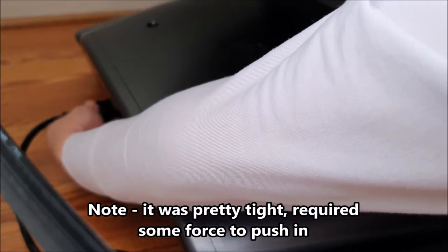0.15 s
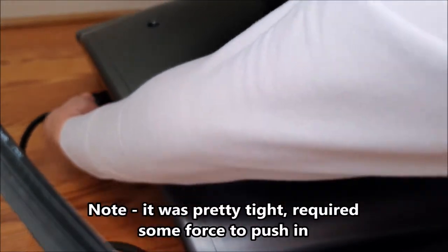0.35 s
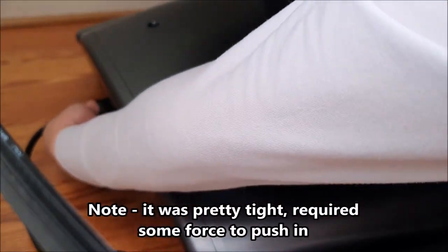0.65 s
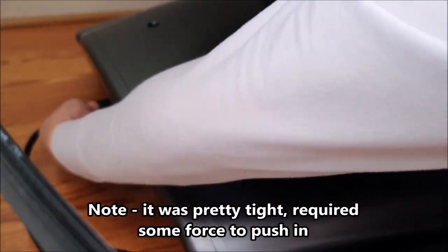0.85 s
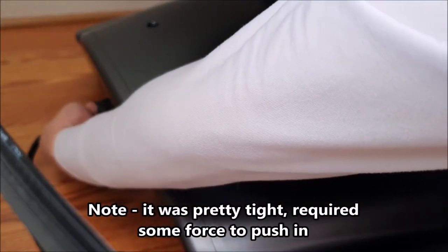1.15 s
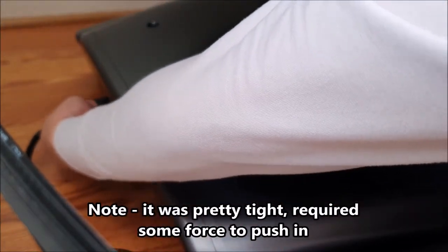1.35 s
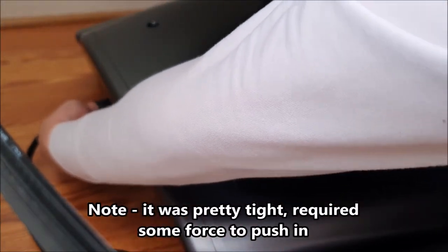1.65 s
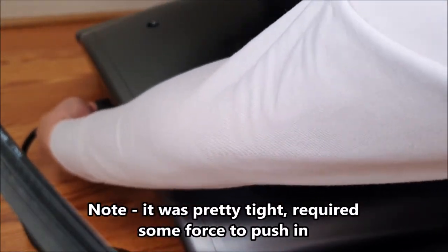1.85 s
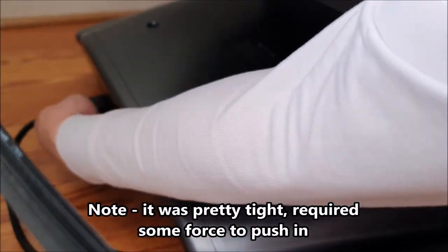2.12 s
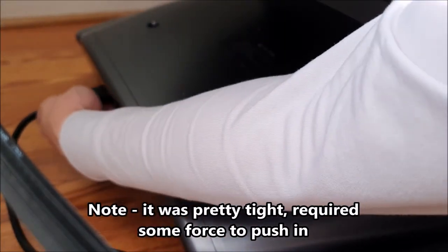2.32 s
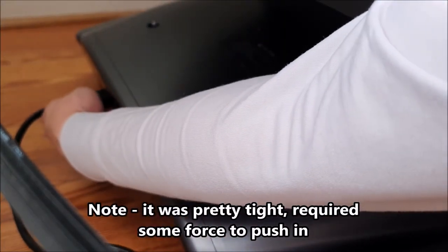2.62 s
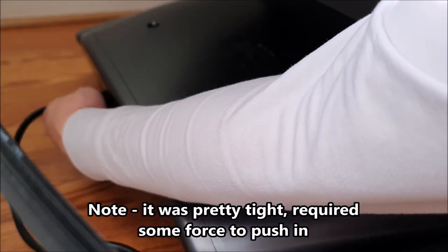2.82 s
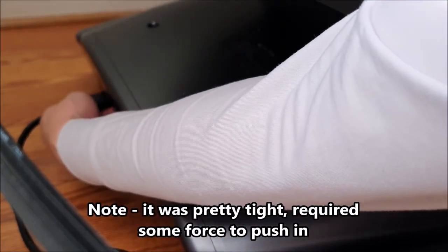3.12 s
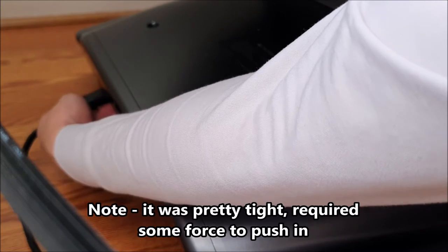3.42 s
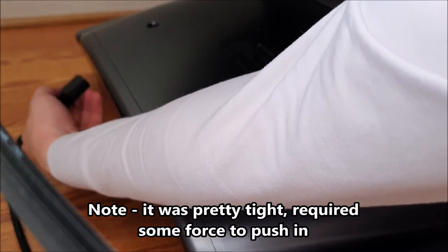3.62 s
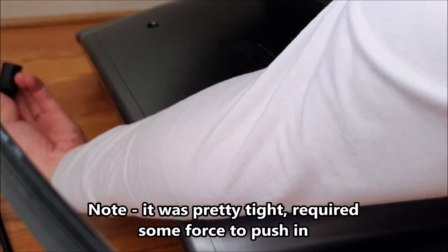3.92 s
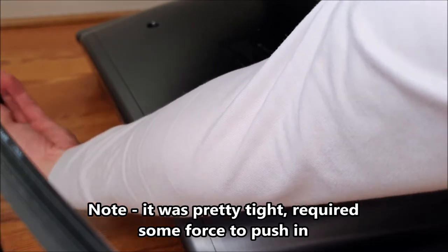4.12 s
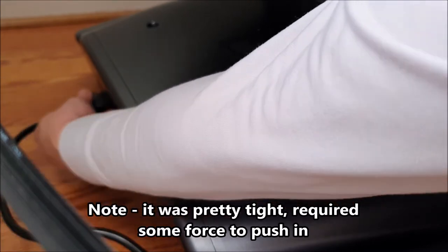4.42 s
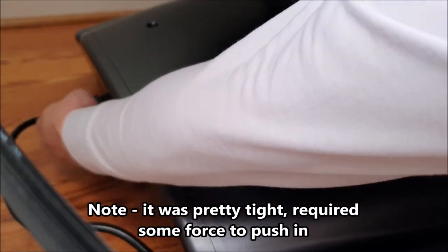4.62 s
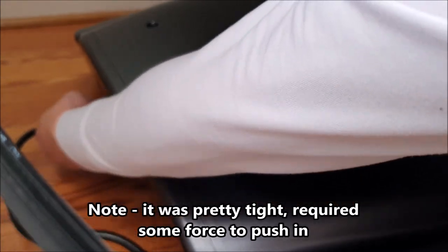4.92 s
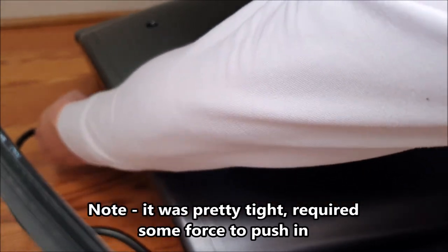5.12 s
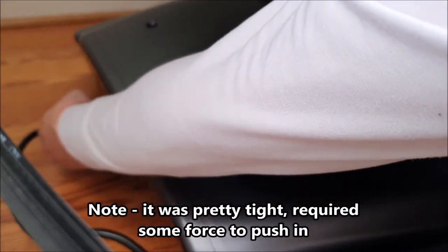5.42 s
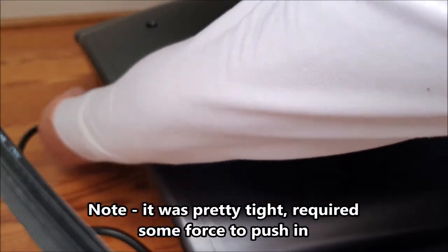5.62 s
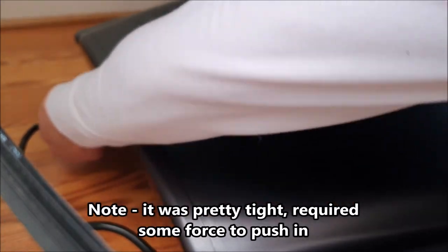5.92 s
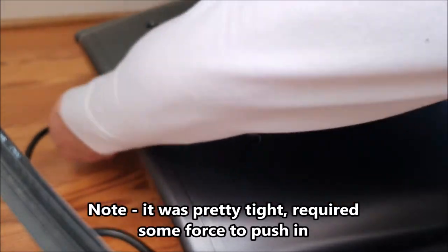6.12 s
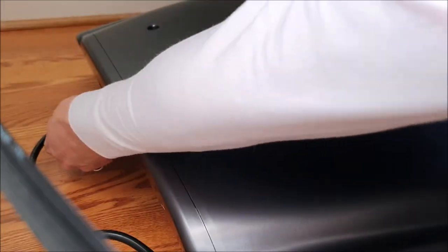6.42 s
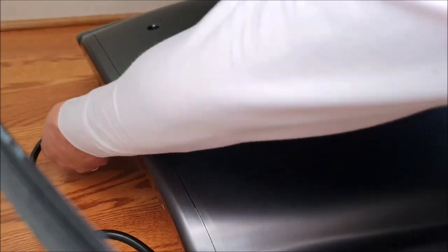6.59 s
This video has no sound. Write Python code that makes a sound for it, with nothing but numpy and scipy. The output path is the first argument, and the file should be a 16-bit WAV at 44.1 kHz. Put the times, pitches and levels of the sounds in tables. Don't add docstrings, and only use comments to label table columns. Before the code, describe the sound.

Close, dry fumbling of a plug at a tight socket: hollow plastic knocks, faint drags, one sharp clack midway, then busier thuds and cloth rubbing.

```python
import sys
import numpy as np
from scipy import signal
from scipy.fft import rfft, irfft, next_fast_len
from scipy.io import wavfile
from scipy.ndimage import uniform_filter1d

SR = 44100
rng = np.random.default_rng(int(sys.argv[2]) if len(sys.argv) > 2 else 0)


def invert_db(x):
    u = np.asarray(x, float) / 20
    return 10 ** u


def waveform_to_disk(signal):
    frames = np.transpose(np.atleast_2d(signal))
    scaled = np.clip(frames, -1, 1) * 32767
    samples = np.round(scaled).astype(np.int16)
    wavfile.write(sys.argv[1], SR, samples)


N = 297983
TIME = np.arange(N) / SR
LOW_HZ, HIGH_HZ = (2600, 7500), (7900, 16500)


def evened(x):
    return x / np.sqrt(np.mean(x ** 2) + 1e-20)


def peaked(x, db):
    return invert_db(db) * x / abs(x).max()


def read(points, hz):
    f, value = np.transpose(points)
    return np.interp(np.log(hz + 1), np.log(f + 1), value)


def add(mix, s, sound):
    part = mix[..., max(round(s * SR), 0):][..., :sound.shape[-1]]
    part += sound[..., :part.shape[-1]]


def coloured(x, points):
    size = next_fast_len(x.shape[-1], True)
    gain = invert_db(read(points, np.fft.rfftfreq(size, 1 / SR)))
    return irfft(rfft(x, size) * gain, size)[..., :x.shape[-1]]


def band(x, edges_hz):
    return signal.sosfilt(signal.butter(5, edges_hz, "band", fs=SR, output="sos"), x)


def unlike(count, own):
    shared, left, right = rng.standard_normal((3, count))
    return evened(shared + own * np.array([left, right]))


def grit(count, uneven_db):
    return rng.standard_normal(count) * invert_db(uneven_db * np.minimum(rng.exponential(1, count), 4))


def chatter(length_s, uneven_db, rise):
    t = TIME[:4096]
    length_s = np.clip(length_s, .0005, .045)
    envelope = np.exp(-(t / (1.435 * length_s)) ** 1.56) * np.minimum(t / (rise * length_s), 1)
    return grit(len(t), uneven_db) * envelope


def wander(smooth_s, depth_db):
    width = max(round(smooth_s * SR), 1)
    slow = uniform_filter1d(uniform_filter1d(rng.standard_normal(N), width), width)
    return invert_db(depth_db * evened(slow))


def body(modes):
    hz, db, t60 = np.transpose(modes)[:, :, None]
    t = TIME[:SR // 4]
    return hz[:, 0], invert_db(db - 60 * t / t60) * np.sin(2 * np.pi * hz * t)


def struck(force, hz, rings, spread_db=2):
    reach = np.interp(hz, np.fft.rfftfreq(16384, 1 / SR), abs(rfft(force, 16384)))
    spot, side = rng.standard_normal((2, len(hz)))
    share = invert_db(spread_db * spot) * np.sign(side) / (reach + 0.025 * reach.mean())
    return signal.fftconvolve(force, share @ rings)


# frequency in Hz, level in dB per Hz.
DENSE_MODES = [(450, 1.5), (750, 11.5), (1500, 7), (2500, -1.5), (2950, -7), (5000, -87)]


def crowd(force, t60_s=0.04):
    energy = signal.fftconvolve(force ** 2, invert_db(-120 * TIME[:SR // 4] / t60_s))
    return np.sqrt(abs(energy)) * coloured(unlike(len(energy), 2.37), DENSE_MODES)


# frequency in Hz, level in dB per Hz.
QUIET_SPECTRUM = [(18, -65), (30, 18.5), (75, -20.5), (141, -4), (364, -0.5), (962, -13), (1190, -11.5),
                  (2120, -11.5), (7470, -28.5), (14800, -22), (16000, -28)]


def hush(level_db=-72):
    shared, left, right = rng.standard_normal((3, N))
    own = signal.lfilter(*signal.butter(2, 500, "high", fs=SR), [left, right])
    common = signal.lfilter(*signal.butter(2, 500, fs=SR), shared)
    return invert_db(level_db) * evened(coloured(common + 0.5 * own, QUIET_SPECTRUM))


# time in seconds, level in dB.
SLEEVE_MOVES = [(0.0, -61), (0.19, -62.5), (0.36, -56), (0.43, -73.5), (0.6, -73.5), (1.05, -93.5),
                (1.37, -83.5), (1.79, -92), (2.11, -75), (2.35, -87), (3.31, -93.5), (3.58, -84.5),
                (3.95, -92), (4.21, -77.5), (4.35, -80.5), (5.0, -83), (6.3, -77.5), (6.76, -89)]
# start in seconds, level at 3-7.5 kHz in dB,
# level above 7.5 kHz in relative dB, stroke length in seconds.
STROKES = [(0.69, -64.5, -4, 0.21), (1.116, -63, -2.5, 0.23), (1.498, -56.5, -8.5, 0.13),
           (2.029, -65, 10, 0.051), (2.198, -57, -9, 0.11), (3.394, -54.5, -16, 0.18),
           (3.78, -74, -12, 0.06), (4.187, -48, -16, 0.094), (4.737, -40.5, -12, 0.13),
           (5.034, -52, -2.5, 0.1), (5.359, -41, -12, 0.087), (5.56, -62.5, 5.5, 0.16),
           (6.08, -44, -9, 0.051), (6.09, -52.5, -3, 0.13), (6.235, -43.5, -15, 0.22),
           (6.363, -55.5, 4, 0.14), (6.542, -59.5, -0.5, 0.16)]
# frequency in Hz, level in dB per Hz.
CLOTH_SPECTRUM = [(1470, 20), (2500, 2), (3570, -4), (4270, -1.5), (6600, -8.5), (7710, -26.5),
                  (11300, -28), (15200, -34), (16000, -21.5)]


def rub():
    moving_db = np.interp(TIME, *np.transpose(SLEEVE_MOVES))
    low, high = invert_db(moving_db + 0.5), invert_db(moving_db - 2)
    for s, db, sizzle_db, length_s in STROKES:
        swell = np.sin(np.pi * np.clip(TIME[:8192] / length_s, 0, 1) ** 0.5) ** 3.4
        add(low, s, invert_db(db - 19.0) * swell)
        add(high, s, invert_db(db + sizzle_db - 13.0) * swell)
    shared, left, right = (grit(N, 5.3) for _ in range(3))
    slips = shared + 13.0 * np.array([left, right])
    fibres = coloured(slips * wander(0.032, 3.0), CLOTH_SPECTRUM)
    return low * evened(band(fibres, LOW_HZ)) + high * evened(band(fibres, HIGH_HZ))


# time in seconds, level in dB.
RESTING_PRESSURE = [(0.0, -77), (0.85, -71.5), (1.08, -96), (1.45, -72.5), (2.3, -74), (2.54, -86),
                    (3.12, -76), (3.8, -92), (3.99, -105), (4.3, -77), (5.0, -82.5), (5.95, -94),
                    (6.4, -72.5), (6.76, -72)]
# middle in seconds, housing level in dB, cover and floor levels
# in dB relative to the housing, half length in seconds.
SLIDES = [(0.076, -60.5, -2, -3.5, 0.63), (0.263, -61.5, 5, 6, 0.44), (0.54, -64.5, 18, 13, 0.036),
          (0.682, -57, -9, -17.5, 0.14), (0.882, -58, -31, -3, 0.15), (1.176, -63, -5, -14, 0.053),
          (1.276, -57.5, -2.5, 11, 0.065), (1.423, -84, 5, -7, 0.11), (1.99, -68.5, -8, 6, 0.16),
          (2.152, -84.5, 3, 21, 0.35), (2.973, -103, -17, -2, 0.32), (3.29, -81, 2, 10, 0.11),
          (3.585, -66.5, 5.5, 29.5, 0.047), (3.698, -73, 0.5, 17, 0.38), (4.172, -43, -2.5, -3.5, 0.059),
          (4.21, -68, 0, 13, 0.085), (4.567, -59.5, -4, 4, 0.42), (4.807, -57, -10, -13, 0.18),
          (5.17, -60.5, -2.5, 11.5, 0.3), (5.3, -47.5, -10, -24, 0.046), (5.636, -46, -17.5, -3.5, 0.16),
          (5.744, -73.5, 11, 19, 0.1), (6.04, -65, 10, 19, 0.11), (6.198, -58.5, -4.5, 13.5, 0.53)]
RESTING_DB = -67.5
SLIDE_FALL_DB = 26


def pressed(column, resting_db, follows):
    t = TIME[::64]
    pressure_db = np.interp(t, *np.transpose(RESTING_PRESSURE)) - RESTING_DB
    gain = invert_db(resting_db + follows * pressure_db)
    for middle, db, *rel_db, half in SLIDES:
        gain = gain + invert_db(db + [0, *rel_db][column] - SLIDE_FALL_DB * abs(t - middle) / half)
    return np.interp(TIME, t, gain)


# frequency in Hz, level in dB, t60 in seconds.
HOUSING_MODES = [(149.8, -5, 0.094), (184, -5, 0.16), (205.5, -5.5, 0.068), (256, -1.5, 0.1),
                 (298.8, -0.5, 0.044), (352, 1.5, 0.1), (395, 1.5, 0.041), (462.9, -3.5, 0.1),
                 (494.5, -3, 0.11), (608, -5.5, 0.049)]
COVER_MODES = [(730, 3, 0.098), (880, -2.5, 0.15), (1027, -9.5, 0.027), (1180, 11, 0.15), (1400, -3, 0.019),
               (1600, -4, 0.04), (1840, 8, 0.054), (1970, 8.5, 0.03), (2300, 0.5, 0.14), (2620, -7, 0.012),
               (2790, -27, 0.035)]
FLOOR_MODES = [(52.7, -6, 0.13), (67.3, -14.5, 0.061), (74.8, -6.5, 0.16), (92.7, -12.5, 0.29),
               (112.1, -4, 0.053)]


def drag():
    gains = pressed(0, RESTING_DB, 1), pressed(1, -76.5, 1), pressed(2, -70, 0.43)
    force = grit(N, 3.9) * wander(0.028, 2.74)
    rung = []
    for modes in (HOUSING_MODES, COVER_MODES, FLOOR_MODES):
        responses = body(modes)[1]
        response = responses[::2].sum(0) - responses[1::2].sum(0)
        rung.append(evened(signal.fftconvolve(force, response)[:N]))
    housing, cover, floor = rung
    cover = .5 * cover + evened(crowd(force)[:, :N])
    floor = floor + 0.47 * evened(band(force, (50, 115)))
    return sum(gain * evened(x) for gain, x in zip(gains, (housing, cover, floor)))


def scraped(rows, rise=0.044, apart_hz=1500):
    out, t = np.zeros((2, N)), TIME[:8192]
    for s, db, hz, length_s, octaves in rows:
        clumps = invert_db(4.0 * evened(uniform_filter1d(rng.standard_normal(len(t)), size=150)))
        grains = abs(grit(len(t), 4.7)) * clumps * unlike(len(t), 2.2 * hz / apart_hz)
        stroke = np.minimum(t / (rise * length_s), 1) * np.exp(-(t / length_s) ** 2)
        edges_hz = hz * 2. ** (np.clip(octaves, .05, 3) * np.array([-.5, .5]))
        patch = signal.butter(2, edges_hz, "band", fs=SR, output="sos")
        sound = signal.sosfilt(patch, stroke * grains)
        add(out, s, invert_db(db) * evened(sound) * np.sqrt(length_s / t[-1]))
    return out


# start in seconds, level in dB, middle in Hz, length in seconds, width in octaves.
SCUFFS = [(0.0, -38, 536, 0.0045, 0.86), (0.031, -56.5, 1850, 0.1, 1.2), (0.125, -61, 1600, 0.074, 0.93),
          (0.364, -56, 3100, 0.033, 0.79), (0.39, -35.5, 335, 0.024, 1.43),
          (0.497, -28.5, 294, 0.0037, 1.9), (0.861, -69, 1120, 0.072, 0.8),
          (1.114, -67.5, 1970, 0.084, 0.32), (1.132, -64, 884, 0.007, 1), (1.162, -67, 1170, 0.04, 1.5),
          (1.27, -71, 1500, 0.021, 3), (1.375, -72, 1970, 0.048, 0.41), (1.933, -63, 2060, 0.015, 0.39),
          (1.95, -60.5, 1670, 0.025, 0.37), (2.014, -74.5, 2260, 0.043, 0.044),
          (2.132, -77, 1540, 0.081, 0.16), (2.209, -70.5, 2400, 0.019, 0.41),
          (2.524, -77, 2100, 0.022, 0.98), (2.772, -82.5, 1630, 0.088, 0.35),
          (3.226, -79, 1400, 0.076, 0.22), (4.1553, -21.5, 2420, 0.00045, 0.65),
          (4.1582, -37, 2930, 0.0035, 1.3), (4.161, -38, 410, 0.021, 1.4), (4.19, -62, 2450, 0.093, 1),
          (4.282, -42.5, 1500, 0.007, 0.28), (4.394, -36, 408, 0.04, 0.76), (4.43, -68.5, 1600, 0.13, 0.49),
          (4.579, -62.5, 1990, 0.031, 0.49), (5.174, -70.5, 1500, 0.041, 3.1),
          (5.26, -57.5, 1770, 0.028, 0.49), (5.381, -36, 1150, 0.0051, 1.45), (5.6, -68, 1600, 0.041, 2.6),
          (5.978, -58, 6300, 0.01, 0.13), (6.019, -64, 5800, 0.014, .4), (6.031, -45.5, 266, 0.087, 0.35),
          (6.098, -54.5, 1500, 0.023, 1.5), (6.209, -62, 2780, 0.0043, 1.5),
          (6.254, -60.5, 1610, 0.036, 0.86), (6.599, -73.5, 2620, 0.086, 0.8),
          (6.741, -79, 4940, 0.0024, 0.78)]


def scuffs():
    return scraped(SCUFFS)


LIGHT_DB, WEIGHTED_DB = -17.5, -2.5
SOFT, HARD = (-6, 0.2), (0.69, 0.18)


def tilted(x, tilt_db):
    padded = np.pad(x, ((0, 0), (0, 16384 - x.shape[1])))
    return coloured(padded, [(600, -tilt_db), (4800, 2 * tilt_db)])


# start in seconds, housing level in dB, cover level in relative dB,
# chatter length in seconds.
NUDGES = [(0.623, -33.5, -4.5, 0.0053), (0.713, -35, -7.5, 0.0078), (0.867, -51.5, 8.5, 0.018),
          (1.136, -38, 0.5, 0.0085), (1.721, -64.5, 14.5, 0.013), (1.903, -69, 14, 0.013),
          (1.939, -48, -1.5, 0.038), (1.962, -42, -10, 0.0064), (2.061, -48.5, -8, 0.015),
          (2.348, -52, -7, 0.028), (2.749, -40, -20, 0.02), (3.004, -51, -8, 0.023), (3.228, -60, 1, 0.013),
          (4.394, -32, -0.5, 0.014), (4.502, -46, 1, 0.022), (4.752, -27.5, -10.5, 0.014),
          (4.772, -25, -11, 0.022), (4.913, -39.5, -8, 0.011), (5.056, -47, -0.5, 0.018),
          (5.159, -30, -12, 0.017), (5.345, -28, -2, 0.021), (5.373, -28.5, 2, 0.0085),
          (5.547, -33.5, -10.5, 0.012), (5.632, -34.5, -33, 0.02), (5.705, -46.5, -0.5, 0.027),
          (6.026, -35.5, -29, 0.021), (6.084, -33.5, -1, 0.018), (6.358, -48.5, 4.5, 0.018),
          (6.515, -59, -20, 0.014)]
KNOCKS = [(0.001, -35.5, -3, 0.014), (0.308, -46.5, 1.5, 0.011), (0.361, -33.5, -0.5, 0.034),
          (0.387, -26, -15, 0.012), (4.076, -54.5, -12, 0.0075), (4.279, -40, 6, 0.0087),
          (4.588, -48.5, -5, 0.027), (5.438, -31.5, -16.5, 0.02), (5.598, -37, -22, 0.029),
          (5.776, -49.5, -1.5, 0.019), (6.178, -34, -8, 0.012), (6.279, -36, 0.5, 0.019)]
SHOVES = [(0.215, -40, -4, 0.0022), (0.497, -24, -2, 0.016), (1.082, -46, -4, 0.1),
          (1.277, -40.5, -1.5, 0.0097), (1.51, -66.5, 11.5, 0.016), (1.622, -51.5, 2, 0.023),
          (3.361, -40, 7.5, 0.0061), (3.452, -46.5, -9, 0.0056), (5.263, -54.5, 10.5, 0.013),
          (5.892, -52, -4, 0.011), (5.948, -46, -21, 0.028), (6.594, -43.5, -5, 0.0067)]
JABS = [(0.059, -46.5, 1, 0.013), (0.457, -31, -4, 0.009), (0.552, -43.5, -0.5, 0.016),
        (0.759, -42, -20, 0.0036), (1.368, -51, -4, 0.031), (1.409, -46.5, -7, 0.024),
        (2.206, -53, -4, 0.029), (2.687, -49.5, -0.5, 0.017), (3.544, -49, 2, 0.0065),
        (3.611, -39, 1, 0.0047), (3.731, -53.5, -5, 0.015), (3.791, -57, -0.5, 0.022),
        (4.155, -27, 11, 0.0097), (6.136, -63, 3, 0.0025), (6.7, -54, -4, 0.0042)]


def bumps():
    out = np.zeros((2, N))
    housing, cover, floor = body(HOUSING_MODES), body(COVER_MODES), body(FLOOR_MODES)
    kinds = ((NUDGES, LIGHT_DB, *SOFT), (KNOCKS, LIGHT_DB, *HARD),
             (SHOVES, WEIGHTED_DB, *SOFT), (JABS, WEIGHTED_DB, *HARD))
    events = sorted((*row, *kind) for rows, *kind in kinds for row in rows)
    for s, db, cover_db, length_s, thud_db, tilt_db, rise in events:
        force = chatter(length_s, 4.0, rise)
        thin = evened(struck(force, *cover)) + 1.8 * evened(crowd(force))
        add(out, s, peaked(struck(force, *housing), db))
        add(out, s, peaked(tilted(thin, tilt_db), db + cover_db))
        add(out, s, peaked(struck(force, *floor), db + thud_db))
    return out


# start in seconds, level in dB, middle in Hz, length in seconds, width in octaves.
GRAZES = [(0.065, -60, 1600, 0.027, 1.3), (0.25, -58, 3500, 0.072, 2.5), (0.395, -52, 3200, 0.015, 1.6),
          (0.5, -46, 1290, .035, 1.5), (0.618, -57.5, 2130, 0.018, 0.24), (3.385, -68, 1400, 0.061, 1.3),
          (3.543, -74, 3550, 0.022, 0.58), (3.61, -70.5, 3450, 0.02, 0.47), (3.675, -71, 1160, .045, 1.2),
          (3.795, -79.5, 2770, 0.049, 0.85), (4.205, -65, 3220, .045, 1.1),
          (4.283, -60.5, 3400, 0.033, 0.46), (4.65, -88, 1200, .08, 1.3), (5.115, -76, 1200, 0.069, 0.42),
          (5.29, -63, 1500, 0.018, 1.1), (5.49, -70, 1400, 0.08, 0.88), (5.549, -52.5, 1400, 0.014, 0.41),
          (6.186, -55, 2080, 0.016, 0.69), (6.13, -65, 3000, 0.035, 1.2), (6.36, -77, 10500, 0.12, 0.45)]


def grazes():
    return scraped(GRAZES)


# start in seconds, level in dB,
# pitch in Hz, sizzle above 7.5 kHz in relative dB.
EDGES = [(0.37, -34, 3080, -22), (0.46, -39, 3470, -37), (2.215, -58, 4860, -31), (3.233, -63.5, 3520, -25),
         (3.3627, -37.5, 3260, -41), (3.416, -52.5, 5000, -30), (3.5474, -59, 2970, -22),
         (3.589, -57, 3170, -32), (3.659, -58, 3530, -20), (4.1568, -23.5, 4040, -17.5),
         (4.281, -50, 3530, -41), (4.407, -46, 5400, -16), (4.506, -53, 4930, -15),
         (4.7845, -47, 4800, -24), (5.262, -49, 5240, -12), (5.384, -59, 4370, -16),
         (6.179, -51.5, 4700, 2)]
PRONGS = [(0.4995, -31, 4040, -9), (0.513, -34, 4600, -6.5), (1.28, -55.5, 5350, -0.5),
          (1.6208, -53.5, 3440, 0), (1.938, -59.5, 4920, 0.5), (2.045, -63, 3450, 15),
          (2.687, -47.5, 6300, 5), (4.441, -46, 5000, -14), (4.812, -48.5, 3170, 4),
          (5.168, -51.5, 5050, -0.5), (5.439, -49.5, 4000, -0.5), (5.547, -58, 3830, 4),
          (5.95, -62.5, 6100, 9.5), (5.979, -60, 6050, 14), (6.02, -54, 6160, 0), (6.2835, -41, 4740, -2),
          (6.306, -64, 6200, 20)]


def clicks():
    out = np.zeros((2, N))
    edge, prong = (0.0054, 0.1), (0.0071, 0.55)
    events = sorted([(*e, *edge) for e in EDGES] + [(*p, *prong) for p in PRONGS])
    for s, db, hz, sizzle_db, length_s, ring in events:
        force = chatter(length_s, 6, 0.5)
        part = struck(force, *body([(hz, 0, .015), (1.4 * hz, -3, .015)]))[:len(force)]
        spray = force + 2.0 * abs(force) * unlike(len(force), 22.0)
        full = evened(band(spray, (2300, 1.22 * hz))) + .3 * evened(band(spray, LOW_HZ))
        add(out, s, peaked(full + ring * evened(part), db))
        add(out, s, peaked(band(spray, HIGH_HZ), db + sizzle_db))
    return out


# start in seconds, peak in dB, pitch in Hz, t60 in seconds.
RINGS = [(0.37, -48, 3250, 0.054), (0.376, -51, 2300, .04), (0.495, -24.5, 255, 0.13),
         (0.5, -35.5, 180, 0.11), (0.523, -30, 209, 0.16), (0.537, -42, 253, 0.063),
         (0.872, -45, 1010, 0.039), (1.141, -34, 1164, 0.057), (1.139, -33, 712, 0.039),
         (1.41, -61, 2050, 0.097), (1.964, -40, 310, 0.032), (2.35, -60, 596, 0.16),
         (2.568, -64, 1180, .06), (2.687, -53, 1180, .05), (2.69, -53.5, 1695, .05),
         (2.69, -51, 2220, 0.032), (0.387, -32, 357, 0.062), (4.163, -25.5, 402, 0.076),
         (1.278, -34.5, 504, 0.044), (1.963, -39.5, 186, 0.093), (2.765, -52.5, 190.7, 0.23),
         (4.194, -29.5, 86.5, 0.17), (4.28, -40, 1500, 0.035), (0.63, -35, 488, .1),
         (2.866, -57, 1180, 0.048), (2.957, -63, 1256, 0.027), (3.012, -52, 368, 0.17),
         (3.015, -70, 1840, 0.11), (3.107, -67, 1210, .04), (3.232, -65, 1370, .08),
         (3.27, -72, 1540, 0.12), (4.155, -37, 4360, 0.075), (4.1575, -24.5, 3630, 0.024),
         (4.158, -28.5, 2300, 0.049), (4.159, -43, 1180, 0.083), (4.16, -47, 3350, .06),
         (4.397, -27, 395, 0.062), (4.406, -32.5, 351, 0.19), (4.396, -26, 1180, 0.028),
         (4.5, -47.5, 1180, 0.14), (5.378, -28.5, 516.4, .14), (5.35, -53, 1880, 0.067),
         (5.548, -29.5, 1183, 0.035), (5.547, -43, 1626, 0.055), (5.554, -61, 4000, 0.052),
         (0.501, -31, 1180, 0.12)]


def rings(rise_s=0.00054):
    out = np.zeros(N)
    for s, db, hz, t60_s in RINGS:
        ring = body([(hz, db, t60_s)])[1][0]
        add(out, s, ring * (1 - np.exp(-TIME[:len(ring)] / rise_s)))
    return out


# start in seconds, level in dB, pitch in Hz,
# chatter length in seconds.
TAPS = [(0.373, -29, 3155, 0.0067), (1.9051, -55, 1870, 0.00094), (2.017, -45.5, 1087, 0.0047),
        (2.521, -70, 1600, 0.0094), (2.564, -62, 1180, 0.0046), (2.637, -60, 1090, 0.0046),
        (2.8689, -68, 1660, 0.003), (2.9093, -59, 1740, 0.0022), (2.955, -57, 1720, 0.0061),
        (3.013, -67, 1714, 0.037), (3.11, -77, 1220, 0.0058), (3.236, -80, 1560, 0.028),
        (4.5996, -48, 1180, 0.0048), (5.547, -54, 1660, 0.006), (5.8925, -56, 1860, 0.006),
        (5.95, -49.5, 1880, 0.0029), (6.178, -45.5, 2180, 0.0049), (6.7, -67, 1550, 0.0079)]


def taps():
    out = np.zeros(N)
    for s, db, hz, length_s in TAPS:
        force = chatter(length_s, 4.6, 0.19)
        ring = struck(force, *body([(hz, 0, .022), (0.7 * hz, -3, .022)]))[:len(force)]
        scratch = band(force, (0.73 * hz, 0.75 * hz))
        add(out, s, peaked(evened(ring) + 0.11 * evened(scratch), db))
    return out


# frequency in Hz, t60 in seconds.
ROOM_DECAY = [(100, 0.37), (500, 0.19), (2000, 0.13), (8000, 0.11)]


def room(x):
    at = np.arange(150, SR // 2, 20)
    echoes = np.zeros((3, SR // 2 + 20))
    places = at + rng.integers(0, 20, (3, len(at)))
    np.put_along_axis(echoes, places, rng.choice([-1., 1.], (3, len(at))), 1)
    hz, t, z = signal.stft(echoes, SR, nperseg=512)
    alike = 1 / (1 + (hz[:, None] / 600) ** 3)
    z = alike * z[0] + np.sqrt(1 - alike ** 2) * z[1:]
    z = z * invert_db(-60 * t / read(ROOM_DECAY, hz)[:, None])
    tail = signal.istft(z, SR, nperseg=512)[1]
    return signal.fftconvolve(np.atleast_2d(x), tail / np.linalg.norm(tail[0]), axes=1)[:, :N]


# frequency in Hz, left minus right in dB.
PORT_BALANCE = [(60, -1.5), (350, 2.5), (1300, -2.5), (4500, 0), (7500, 6), (10000, 9)]


def ports(x, lag_s=0.000464, corner_hz=600):
    size = next_fast_len(N, True)
    hz = np.fft.rfftfreq(size, 1 / SR)
    lead = np.pi * hz * lag_s * hz ** 2 / (hz ** 2 + corner_hz ** 2)
    half = invert_db(read(PORT_BALANCE, hz) / 2) * np.exp(1j * lead)
    return irfft(rfft(x, size) * np.array([half, 1 / half]), size)[:, :N]


def scene():
    near = bumps() + clicks() + taps() + drag() + rub() + scuffs() + rings()
    echoes, tone = invert_db(-6.5) * room(near), hush()
    return ports(invert_db(0.5) * (near + grazes()) + echoes) + tone


def roll_off(x):
    return signal.sosfilt(signal.butter(12, 16300, fs=SR, output="sos"), x)


def record(dry):
    thinned = signal.sosfilt(signal.butter(3, 52, "high", fs=SR, output="sos"), dry)
    edge = signal.firwin(511, 15750, window=("kaiser", 9), fs=SR)
    return roll_off(signal.oaconvolve(thinned, edge[None], "same"))


dry = scene()
out = record(dry)
waveform_to_disk(out)
```